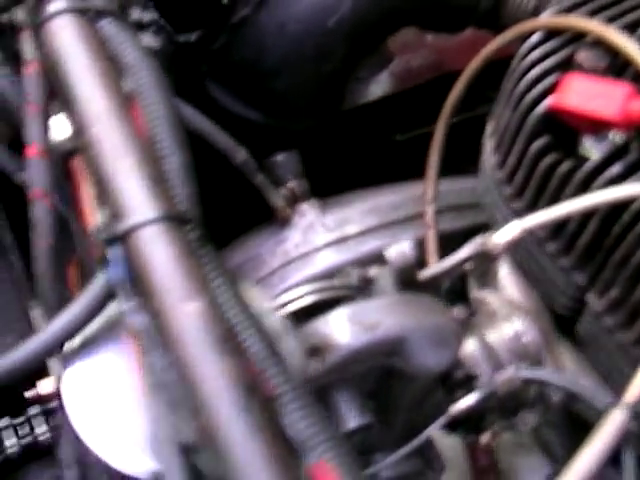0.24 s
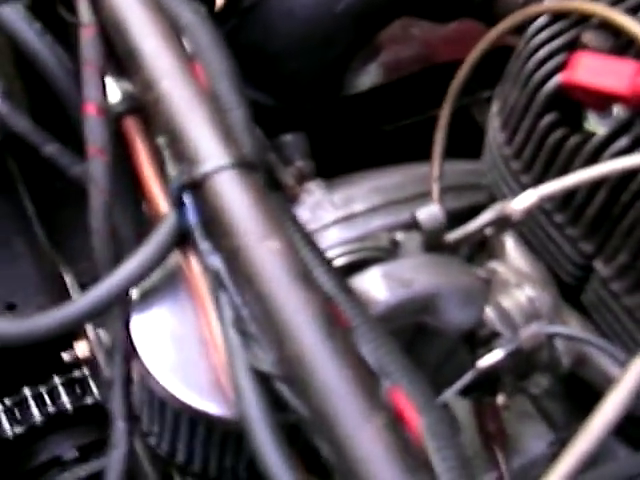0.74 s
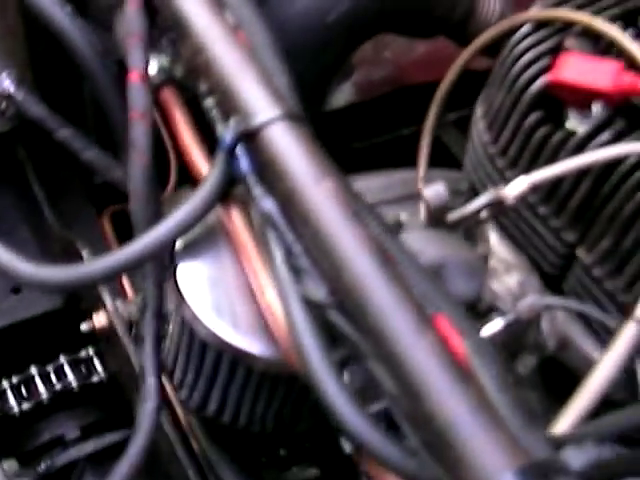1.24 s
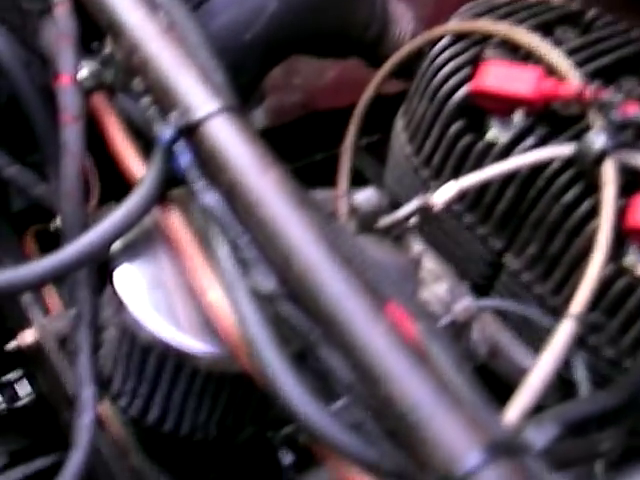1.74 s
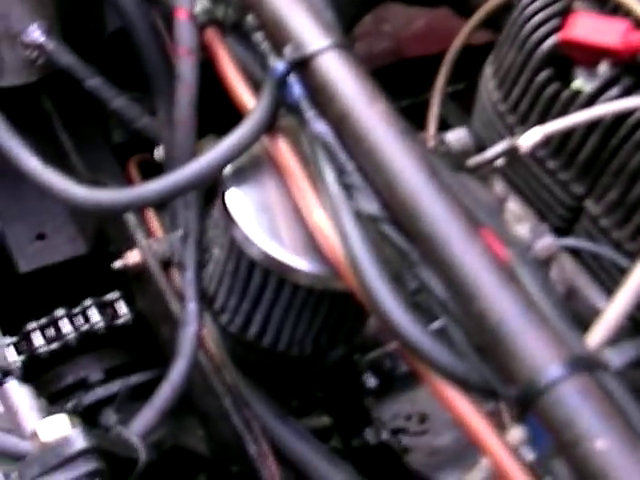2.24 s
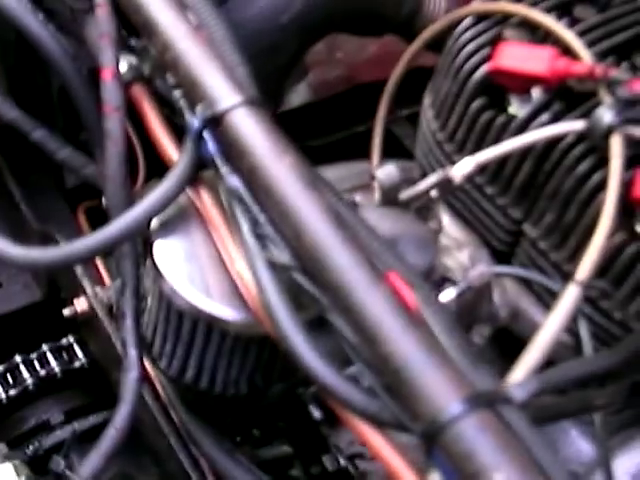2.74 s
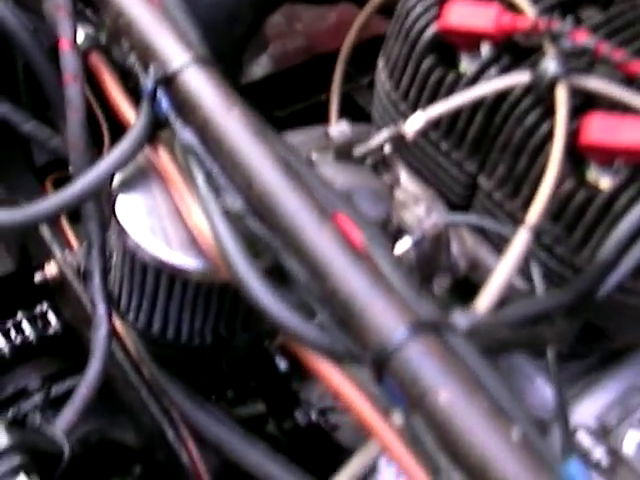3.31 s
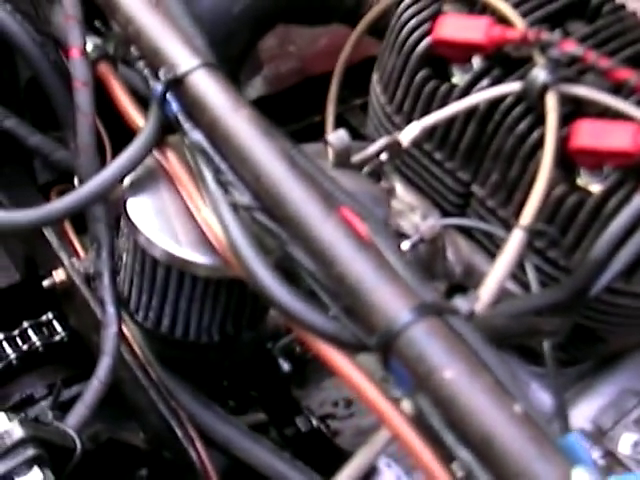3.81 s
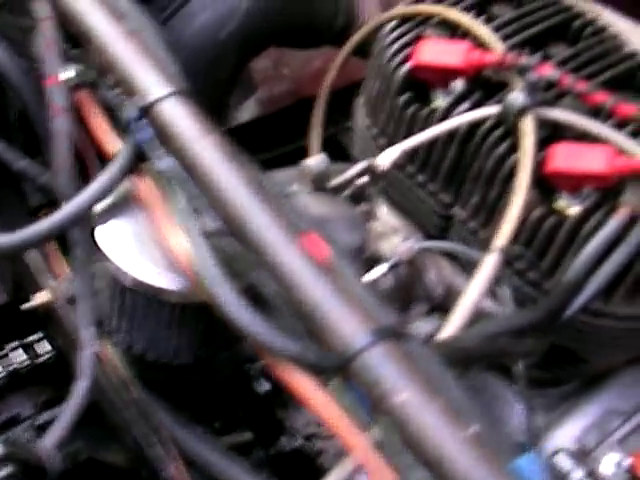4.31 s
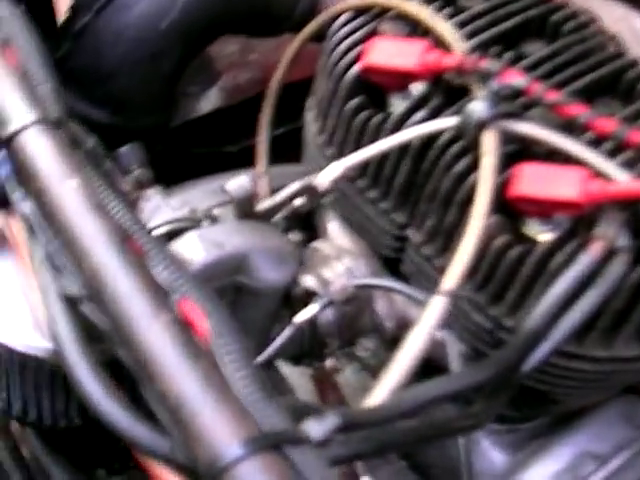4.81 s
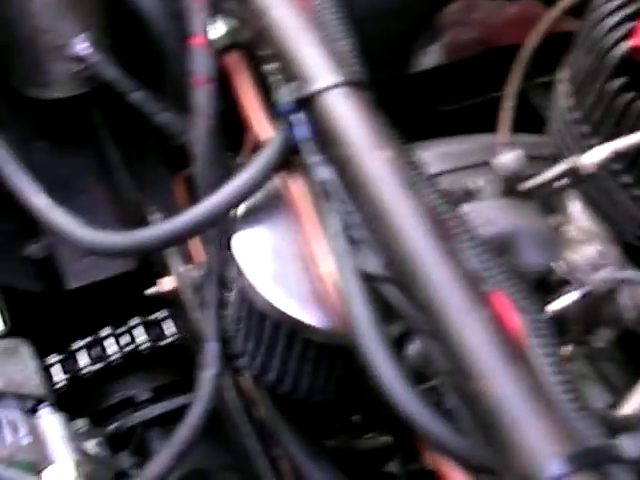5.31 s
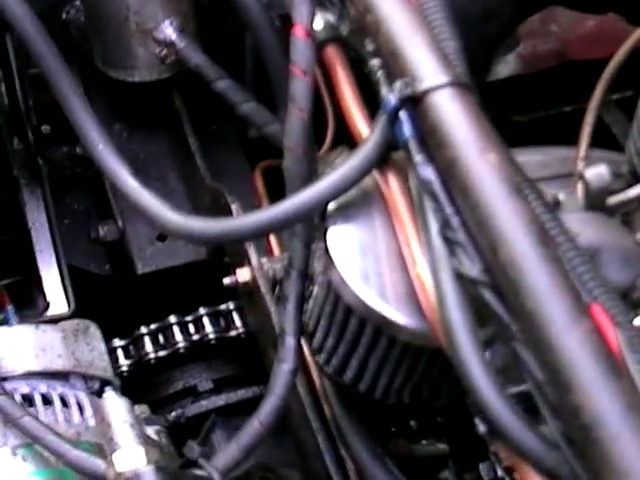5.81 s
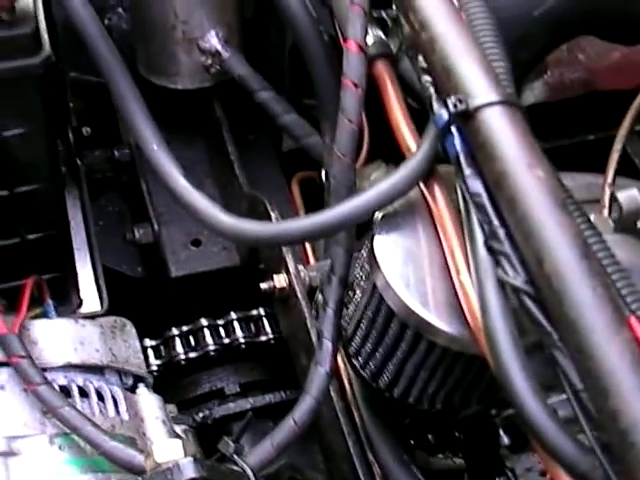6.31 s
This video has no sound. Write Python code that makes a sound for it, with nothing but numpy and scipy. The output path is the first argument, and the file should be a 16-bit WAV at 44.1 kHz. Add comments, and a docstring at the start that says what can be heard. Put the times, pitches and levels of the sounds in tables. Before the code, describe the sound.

A small air-cooled two-cylinder two-stroke engine is already idling, heard from close above, and runs without a break for about six and a half seconds. Metal parts clack, knock and thud in a rapid, even pattern over a steady whirr, with a bright ring from the cooling fins. Beneath this, the exhaust booms in low pulses five to six times a second, each strong pulse carrying a thin, very high spit of gas. The idle is slightly faster at the start and settles by about 1 second, then stays steady. The spitting stands out a little more around 1, 2.5 and 4.5 seconds. As the microphone moves over the engine, the balance of rasp, ring and exhaust shifts gently, with the exhaust slightly fuller from about 5.8 seconds. The small garage adds a faint, short echo.

```python
"""Two-stroke engine idling in a garage

A small air-cooled two-cylinder engine is heard from close above its cooling fins. The crank turns
about 17 times a second (20 at first), and on every turn metal parts clack, knock and ring over a whirr.
Only every third turn (every fourth at first) burns strongly: the exhaust booms and a jet of gas spits."""
import sys
import numpy as np
from scipy import signal
from scipy.fft import rfft, irfft, next_fast_len
from scipy.io import wavfile

SR = 44100
rng = np.random.default_rng(int(sys.argv[2]) if len(sys.argv) > 2 else 0)


def unload_wav(signal):
    """Save mono or channel-first audio to the path in sys.argv[1] as 16-bit WAV at rate SR, clipped to [-1, 1]."""
    wavfile.write(
        sys.argv[1],
        SR,
        np.round(np.clip(np.atleast_2d(signal).T, -1, 1) * 32767).astype(np.int16),
    )


N = 288855
TIME = np.arange(N) / SR
START_TURNS = 0.776   # crank turns since the last strong burn, at 0 s
FAST_TURNS_PER_S = 18.9   # above this speed a strong burn takes one turn longer to come

# the crank settles to a slow idle: t/s, speed/(turns per second)
CRANK_SPEED = [(0, 20.08), (0.45, 19.77), (0.68, 18.4), (0.85, 18.83), (1.05, 17.39), (2.4, 17.41),
               (2.55, 17.05), (3.7, 17.07), (5.4, 17.42), (5.75, 16.97), (6.55, 17.45)]
# exhaust puffs from one strong burn to the next: share of that cycle, relative level/dB
EXHAUST_PUFFS = [(0.058, 3), (0.169, -9.5), (0.309, -9), (0.473, -4.5), (0.652, -36), (0.812, -4.5),
                 (.95, -3)]
# low notes of the exhaust pipes and the garage: f/Hz, width/Hz, relative level/dB
PIPE_NOTES = [(85.7, 4.8, 5.5), (111.3, 13.6, -5), (156.7, 13.6, 9), (185, 32, 1), (230.4, 26.4, 2.5),
              (289.3, 20, -10)]
# how hard the gas jet spits: t/s, relative level/dB
SPIT_STRENGTH = [(.6, 3.5), (.94, 10), (1.25, 3.5), (2.3, 2), (2.55, 8.5), (3.05, 2), (4.55, 7), (5.2, 3.5),
                 (5.7, 1), (6.55, -0.5)]
# where parts hit in each turn, and how hard: angle/turns, relative levels of clack/dB, knock/dB, thud/dB
CRANK_HITS = [(.115, 3, -0.5, 1.5), (.22, -7, 0, -14), (0.391, -11.5, -11, -9), (.605, 8.5, -31, -4.5),
              (.67, 0.5, -6.5, -23), (.79, -23, -3, -33), (0.953, -8, -4, 0)]
# ringing notes of the fins and the engine's metal body: f/Hz, width/Hz, relative level/dB
FIN_NOTES = [(1102.8, 9.6, 10), (1742, 84, 1), (1857, 19, 6), (2280, 15, 3.5), (2439, 37, 5), (2465, 24, 6),
             (2767, 35, 4.5), (2795, 17, 3.5), (3126, 16, 6), (3364, 12, 4.5), (3830, 19, 6.5),
             (4165, 65, 5.5), (4310, 29, 4), (4670, 23, -5), (4694, 32, 6.5), (5010, 29, 2),
             (5140, 30, 6.5), (5300, 99, -2), (5940, 120, -13)]
# tone colour of each sound, from bass to treble: f/Hz, relative level/dB
WHIRR_COLOUR = [(25, -55), (62, 2), (120, 5.5), (220, 4), (370, -14.5), (700, -11), (900, -13.5),
                (1300, -14.5), (1750, -1), (2600, -0.5), (3400, -2.5), (5000, -9.5), (7000, -5.5),
                (11000, -19), (14000, -39)]
SPIT_COLOUR = [(3000, -5), (8000, -3.5), (9500, 0.5), (10700, 8), (11700, 11.5), (12600, 3), (14000, -10)]
CLACK_COLOUR = [(500, -20.5), (1500, -10), (3000, -1), (4300, 1.5), (4800, -2), (5300, -0.5), (5700, -2),
                (6200, 5), (6550, 2.5), (7200, -5.5), (9500, -8), (10500, -6.5), (12000, -10), (14000, -25)]
KNOCK_COLOUR = [(400, -33.5), (1300, -12.5), (1800, -5), (2450, -2), (2850, 2), (3400, -6.5), (4500, -12),
                (7000, -21), (13000, -20.5)]
THUD_COLOUR = [(200, -12), (400, -18), (700, -4), (900, -12), (1400, -2.5), (1750, -2), (2200, 0.5),
               (3200, -21), (8000, -49)]
# boosts as the listener moves over the engine: t/s, exhaust bark/dB, rasp/dB, thud/dB, fin ring/dB
LISTENING_SPOT = [(0, -1, 3.5, -2, -2.5), (.6, 1.5, 1.5, 1, -2), (1.1, -1, 0, 1, 3), (2.2, -3, -0.5, 2, 1),
                  (3.1, 0.5, 0.5, 0.5, 2.5), (4.2, -1, 0, 0.5, 2), (5.2, -3.5, 1.5, -1, 0.5),
                  (5.8, 1.5, 0.5, 1.5, 1.5), (6.55, 2, 0, 0, 2.5)]
# how alike the left and right sides are: f/Hz, likeness (1 = fully alike)
STEREO_LIKENESS = [(30, 0.46), (70, 0.71), (150, 0.96), (400, 1), (700, 1), (1400, 0.94), (2600, 0.9),
                   (5000, 0.51), (9000, 0.17), (12000, 0.76)]
# the treble leans to the right: f/Hz, left minus right level/dB
STEREO_LEAN = [(100, -0.5), (650, 0), (1230, -1), (2260, -2.5), (4100, -2.5), (12000, -2)]
# unequal paths to the two microphone openings: f/Hz, phase lead of the left side/rad
STEREO_PHASE = [(1500, -0.11), (2150, 0.01), (3360, 1), (3880, 0.66), (4570, 0.13), (6550, -0.27),
                (7200, 0.22), (9700, 0.66), (11500, 1), (14000, -0.068)]


def from_db(db):
    """Turn decibels into a factor to multiply by."""
    return 10 ** (np.asarray(db) / 20)


def unit_power(x):
    """Scale a sound so that its average power is 1."""
    return x / np.sqrt(np.mean(x ** 2) + 1e-20)


def at_hz(table, hz):
    """Look up frequencies in a table, with octaves evenly spaced."""
    known_hz, values = np.transpose(table)
    return np.interp(np.log(hz + 1e-3), np.log(known_hz), values)


def resonate(x, hz, width_hz):
    """Keep the sound near one pitch; the narrower the band, the longer it rings."""
    r = np.exp(-np.pi * width_hz / SR)
    feedback = [1, -2 * r * np.cos(2 * np.pi * hz / SR), r * r]
    return signal.lfilter(np.array([1, 0, -1]) * (1 - r * r) / 2, feedback, x + 1e-18)


def smooth(x, seconds):
    """Follow a signal with a lag, evening out quick changes."""
    r = np.exp(-1 / (seconds * SR))
    return signal.lfilter([1 - r], [1, -r], x + 1e-18)


def clicks(times, sizes):
    """One click of the given size at each time."""
    inside = (times >= 0) & (times < TIME[-1])
    return np.bincount((times[inside] * SR).astype(int), sizes[inside], N)


def fading_bursts(times, level_db, fade_s, rise_s):
    """Loudness curve of bursts whose energies add up; each falls by 60 dB in fade_s."""
    energy = smooth(clicks(times, from_db(level_db) ** 2), fade_s / np.log(1e6))
    return np.sqrt(smooth(energy, rise_s))


def noise(colour, grain_db):
    """Grainy stereo noise with the given tone colour."""
    size = next_fast_len(N)
    hz = np.arange(size // 2 + 1) * SR / size
    grain_levels = from_db(grain_db * np.clip(rng.standard_normal(size // 24 + 1), -2, 2))
    grains = np.repeat(grain_levels, 24)[:size]
    mid, side = rfft(rng.standard_normal((2, size)) * grains) * from_db(at_hz(colour, hz))
    alike = np.clip(at_hz(STEREO_LIKENESS, hz), -1, 1)
    both = np.sqrt(1 + alike) * mid + np.sqrt(1 - alike) * side * np.array([[1], [-1]])
    left = from_db(at_hz(STEREO_LEAN, hz) / 2) * np.exp(1j * at_hz(STEREO_PHASE, hz) / 2)
    return unit_power(irfft(both * [left, 1 / left], size)[:, :N])


def strong_burns():
    """Times and crank turns of the strong burns: every third turn, or every fourth when running fast."""
    t = np.arange(-SR // 2, N + SR // 2, 40) / SR
    speed = np.interp(t, *np.transpose(CRANK_SPEED))
    angle = np.cumsum(speed) * (t[1] - t[0])
    angle = angle + START_TURNS - np.interp(0, t, angle)
    turns = [0]
    while turns[-1] < np.interp(TIME[-1], t, angle):
        fast = np.interp(turns[-1], angle, speed) > FAST_TURNS_PER_S
        turns.append(turns[-1] + (4 if fast else 3))
    return np.interp(turns, angle, t), np.array(turns)


def cycle_wave(rises_at):
    """One sine wave from each strong burn to the next, rising through zero at a share of that cycle."""
    burn_times, _ = strong_burns()
    cycles = np.interp(TIME, burn_times, np.arange(len(burn_times)))
    return np.sin(2 * np.pi * (cycles - rises_at))


def garage_echo(x, fade_s, level_db):
    """The walls send back a short wash of echoes, different at each ear."""
    t = TIME[:SR // 2]
    tail = rng.standard_normal((2, len(t))) * from_db(-60 * t / fade_s) * (t > 0.008)
    tail /= np.sqrt(np.sum(tail ** 2, axis=1, keepdims=True))
    return from_db(level_db) * signal.fftconvolve(x, tail, axes=1)[:, :N]


def whirr():
    """The steady rushing noise of the running engine."""
    return from_db(-18.5) * noise(WHIRR_COLOUR, grain_db=0.5)


def gas_spit(lead_s, scatter_db):
    """A thin jet of gas escapes at the pressure peak of each strong burn, never twice equally hard."""
    times, _ = strong_burns()
    jet = noise(SPIT_COLOUR, grain_db=2)
    strength_db = np.interp(times, *np.transpose(SPIT_STRENGTH))
    strength_db += scatter_db * np.clip(rng.standard_normal(len(times)), -2, 2)
    bursts = fading_bursts(times - lead_s, strength_db, fade_s=0.063, rise_s=0.0023)
    return from_db(-23) * unit_power(bursts) * jet


def exhaust(bark_db, scatter_db, jitter_s):
    """Puffs of gas make the pipes ring: the wide notes bark at once, the narrow ones boom later."""
    burn_times, _ = strong_burns()
    shares, puff_db = np.transpose(EXHAUST_PUFFS)
    times = (burn_times[:-1, None] + np.diff(burn_times)[:, None] * shares).ravel()
    time_luck, size_luck = rng.standard_normal((len(times), 2)).T
    sizes = from_db(np.resize(puff_db, len(times)) + scatter_db * size_luck)
    puffs = clicks(times + jitter_s * time_luck, sizes)
    boom = 0
    for hz, width_hz, db in PIPE_NOTES:
        gain = from_db(db + bark_db * (hz > 200))
        boom = boom + gain * resonate(resonate(puffs, hz, width_hz), hz, width_hz)
    sway = from_db(-0.5 * cycle_wave(rises_at=0.017))   # dips after a strong burn, lifts before the next
    return from_db(-22.5) * unit_power(boom * sway)


def metal_hits(angle, places, level_db, swing_db, colour, fade_s, solid_share, scatter_db, jitter_s):
    """Parts meet on each turn: a solid hit that rings alike every time, plus a loose rattle."""
    hit_angles = np.arange(int(angle[-1]) + 1)[:, None] + places
    time_luck, force_luck = rng.standard_normal((2,) + hit_angles.shape)
    times = np.interp(hit_angles, angle, TIME, left=-1, right=-1) + jitter_s * time_luck
    force_db = level_db + np.interp(times, TIME, swing_db) + scatter_db * np.clip(force_luck, -2, 2)
    bursts = fading_bursts(times.ravel(), force_db.ravel(), fade_s, rise_s=0.001)
    rattle = bursts * noise(colour, grain_db=1.0)
    size = SR // 8
    metal = noise(colour, grain_db=-1.5)
    fade = from_db(-60 * TIME[:size] / fade_s)
    solid = 0
    for k in range(len(places)):
        ring = metal[:, k * size:(k + 1) * size] * fade   # each contact point has its own ring
        strikes = clicks(times[:, k], from_db(force_db[:, k]))
        solid = solid + signal.oaconvolve(strikes[None], ring, axes=1)[:, :N]
    return np.sqrt(solid_share) * unit_power(solid) + np.sqrt(1 - solid_share) * unit_power(rattle)


def clatter(thud_boost_db):
    """Pistons, rods and gears clack, knock and thud, a little harder in the weak turns."""
    surge = 0.0415 * cycle_wave(rises_at=0.176)   # the crank speeds up and slows once in each cycle
    angle = np.interp(TIME, *strong_burns()) + surge   # in turns
    places, clack_db, knock_db, thud_db = np.transpose(CRANK_HITS)
    clack_swing_db = 0.9 * cycle_wave(rises_at=0.51)
    knock_swing_db = 0.82 * cycle_wave(rises_at=0.32)
    clack = metal_hits(angle, places, clack_db, clack_swing_db, CLACK_COLOUR,
                       fade_s=0.067, solid_share=0.51, scatter_db=1.57, jitter_s=0.00056)
    knock = metal_hits(angle, places, knock_db, knock_swing_db, KNOCK_COLOUR,
                       fade_s=0.13, solid_share=0.37, scatter_db=0.7, jitter_s=0.0005)
    thud = metal_hits(angle, places, thud_db, knock_swing_db, THUD_COLOUR,
                      fade_s=0.19, solid_share=0.33, scatter_db=3.0, jitter_s=0.000716)
    return from_db(-19) * clack + from_db(-19.5) * knock + from_db(-25 + thud_boost_db) * thud


def ringing_fins(shake, rasp_db, ring_db):
    """The engine's shaking, with its rasp turned up or down and the ring of the fins added."""
    rasp = resonate(shake, hz=4000, width_hz=1800)
    shake = shake + (from_db(rasp_db) - 1) * rasp
    ring = sum(from_db(db - 2.5) * resonate(shake, hz, width_hz) for hz, width_hz, db in FIN_NOTES)
    return shake + from_db(ring_db) * ring


def scene():
    """Clatter, spit and exhaust boom in a small garage; the mix shifts as the listener moves."""
    times, *boosts = np.transpose(LISTENING_SPOT)
    bark_db, rasp_db, thud_db, ring_db = (np.interp(TIME, times, boost) for boost in boosts)
    engine = ringing_fins(clatter(thud_db) + whirr(), rasp_db, ring_db)
    engine += gas_spit(lead_s=0.0043, scatter_db=1.5)
    engine += exhaust(bark_db, scatter_db=2.5, jitter_s=0.00041)
    return engine + garage_echo(engine, fade_s=0.15, level_db=-15)


def limiter(x, threshold_db, lag_s):
    """Turn the whole sound down for a moment whenever the high treble gets too loud."""
    treble = signal.sosfilt(signal.butter(2, 9000, "high", fs=SR, output="sos"), x)
    level = np.sqrt(smooth(np.mean(treble ** 2, axis=0), 0.0005))
    excess = np.maximum(level / from_db(threshold_db) - 1, 0)
    return x / (1 + smooth(excess, lag_s))


def record(dry):
    """The microphone colours the sound, peaks are tamed, and the treble stops at 13700 Hz."""
    x = dry - 0.9 * resonate(dry, hz=7810, width_hz=2270)   # the microphone housing cancels this band
    x = limiter(x, threshold_db=-18.5, lag_s=0.0079)
    x = x / (1 + (x / 0.9) ** 8) ** (1 / 8)   # round off the tallest peaks
    return signal.sosfilt(signal.ellip(10, 0.2, 70, 13700, fs=SR, output="sos"), x)


dry = scene()
out = record(dry)
unload_wav(out)
```